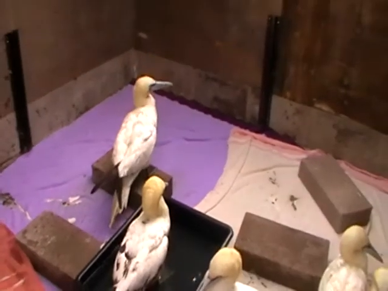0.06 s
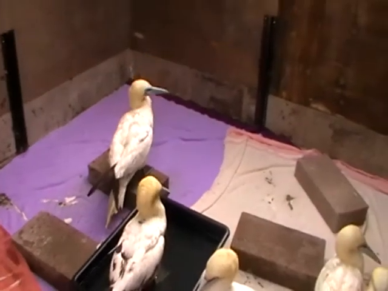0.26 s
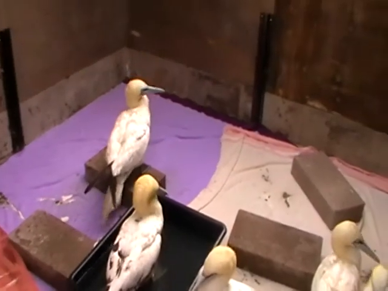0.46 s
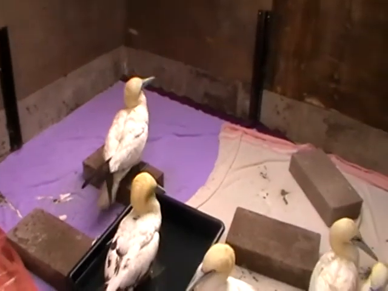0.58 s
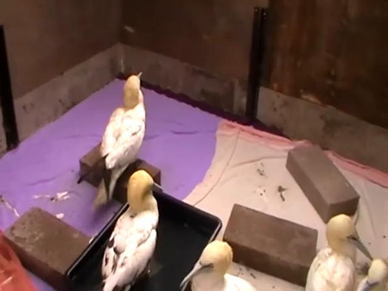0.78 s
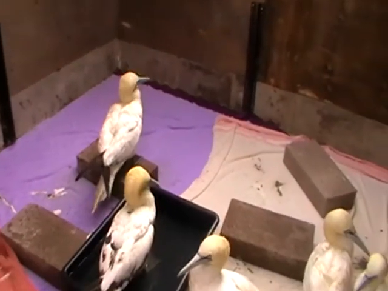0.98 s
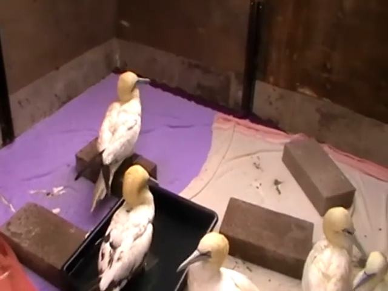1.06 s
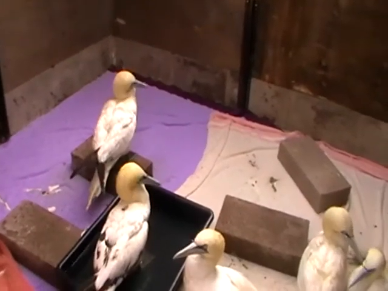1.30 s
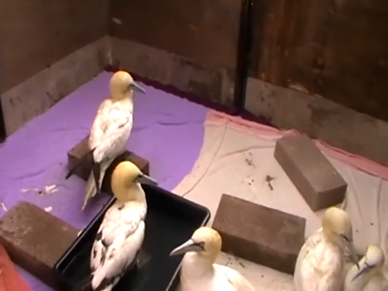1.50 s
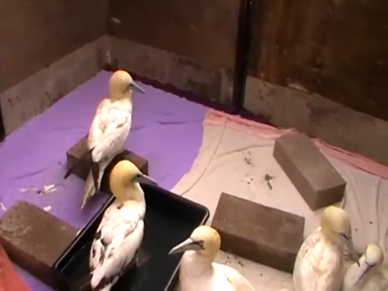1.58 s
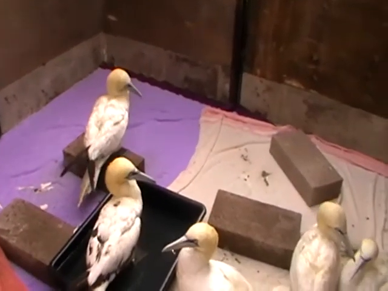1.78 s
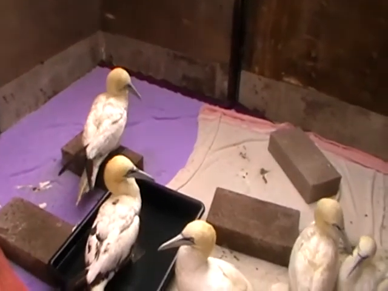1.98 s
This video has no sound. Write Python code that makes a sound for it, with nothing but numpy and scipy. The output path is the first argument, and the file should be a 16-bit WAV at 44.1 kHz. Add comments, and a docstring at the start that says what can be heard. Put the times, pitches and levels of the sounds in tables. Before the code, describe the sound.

One hoarse seabird squawk, squeaky at first and then rough and rattling, comes from fairly close in front of the microphone. The hard walls of a small pen ring briefly, and low ventilation noise runs throughout.

```python
"""A gannet gives one harsh call in a small indoor pen, nearly centred before a stereo microphone.
The two sides of its syrinx sound at once: a low, slowly sinking voice and a brief high whistle that
jumps register. The low voice splits into subharmonics and breaks up into a rasp of irregular pulses.
The bird is close enough to stand a little above the answer of the walls; ventilation runs behind it."""
import sys
import numpy as np
from scipy import signal
from scipy.fft import rfft, irfft, next_fast_len
from scipy.io import wavfile
from scipy.ndimage import map_coordinates

SR = 44100
rng = np.random.default_rng(int(sys.argv[2]) if len(sys.argv) > 2 else 0)


def bounce(signal):
    """Save signal as a 16-bit WAV file at the path given by the first command-line argument."""
    frames = np.transpose(np.atleast_2d(signal))
    limited = np.clip(frames, -1, 1)
    pcm = np.round(limited * 32767).astype(np.int16)
    wavfile.write(sys.argv[1], SR, pcm)


N = 90404

# colour of the ventilation: frequency_hz, gain_db
VENT_SPECTRUM = [(25, -16), (60, -6), (100, -4), (140, -1), (200, -2.5), (280, -2.5), (370, 0), (520, -2.5),
                 (700, -4), (1000, -6), (1500, -7.5), (2200, -12), (4400, -18), (7000, -27), (10000, -37.5),
                 (15500, -44.5)]
# likeness of the air noise left and right: frequency_hz, correlation
VENT_CORRELATION = [(60, 0.89), (180, 0.93), (550, 0.9), (1650, 0.56), (4970, 0.74), (15000, 0.13)]
# fan hum: pitch_hz, level_db
FAN_HUM = [(41, -63.5), (82, -70), (366, -63.5)]
# time the pen takes to die away by 60 dB: frequency_hz, decay_s
PEN_DECAY = [(300, 0.36), (2700, 0.41), (6000, 0.34), (12000, 0.24)]

# The bird's levels are relative, ahead of its overall gain in scene().
# strength of the rasp: time_s, level_db
RASP_LEVEL = [(.195, -54.5), (.228, -30.5), (.245, -36), (.29, -42), (.35, -55), (.42, -43), (.5, -40),
              (.6, -38.5), (.66, -35.5), (.78, -36), (.89, -34), (.97, -33.5), (1.0, -38), (1.03, -33.5),
              (1.06, -50.5), (1.095, -72)]
# resonances of the throat and open bill: frequency_hz, gain_db
THROAT_RESPONSE = [(600, -55.5), (1150, -24), (1350, -6), (1490, -8), (1620, -3), (1780, -3.5), (1950, -13),
                   (2170, 1.5), (2440, -9), (2780, -2.5), (3400, -10.5), (4100, -13), (4800, -15.5),
                   (5550, -18), (6100, -27), (7200, -26), (8600, -30.5), (11000, -40), (15000, -60.5)]
# the rasp's treble, duller as the call starts and ends: time_s, gain_db
RASP_TREBLE = [(.2, -3), (.25, 0.5), (.5, 7), (.72, 3.5), (.9, 0.5), (1.04, -7)]
# whistle notes: start_s, end_s, first_pitch_hz, last_pitch_hz, level_db, upper_partials_db
WHISTLE_NOTES = [(0.237, 0.278, 2667, 2620, -28, -0.5), (0.286, 0.312, 2623, 2635, -41.5, 8),
                 (0.288, 0.341, 3406, 3510, -33.5, -2.5), (0.323, 0.368, 3375, 3320, -30, -10.5),
                 (0.374, 0.441, 2644, 2561, -30.5, 1), (0.406, 0.447, 3340, 3253, -37, -7.5)]
# whistle harmonics and sum tones, fundamental first: whistle_multiple, low_voice_multiple, gain_db
WHISTLE_PARTIALS = [(1, 0, -2), (2, 0, -10.5), (3, 0, -23.5), (1, 1, -10.5), (2, 1, -24.5)]
# subharmonics, on quarters of the low pitch: quarter_multiple, gain_db
SUBHARMONIC_LINES = [(5, -7.5), (6, -4.5), (7, -6.5), (9, -6.5), (10, -28), (11, -6), (13, -11), (14, -22),
                     (15, -13.5)]
# strength of the subharmonics: time_s, level_db
SUBHARMONIC_LEVEL = [(.42, -70), (.46, -39.5), (.51, -42), (.55, -32.5), (.585, -58), (.65, -36.5),
                     (.76, -44), (.815, -38), (.85, -45), (.9, -35.5), (.95, -43)]
# faint undertone at a quarter of the low pitch: time_s, level_db
UNDERTONE_LEVEL = [(.38, -53), (.58, -67.5), (.65, -52.5), (.9, -63.5), (.98, -47), (1.07, -53.5)]
# sinking pitch of the low voice: time_s, pitch_hz
VOICE_PITCH = [(.24, 1567), (.30, 1535), (.40, 1503), (.47, 1443), (.595, 1431), (.625, 1379), (.665, 1412),
               (.72, 1367), (.80, 1356), (.89, 1340), (.98, 1148), (1.06, 978)]
# strength of the low voice: time_s, level_db
VOICE_LEVEL = [(.235, -68), (.262, -31), (.305, -43.5), (.33, -62), (.385, -49.5), (.405, -33.5),
               (.432, -44.5), (.458, -27.5), (.505, -29.5), (.53, -31.5), (.575, -33), (.62, -32),
               (.652, -42.5), (.675, -34.5), (.71, -36), (.735, -44.5), (.765, -31.5), (.805, -49),
               (.835, -37.5), (.89, -38.5), (.94, -76)]
# overtones of the low voice: multiple, gain_db
VOICE_OVERTONES = [(2, -1), (3, -10.5), (4, -19.5), (5, -27), (6, -32.5)]
# lift of all those overtones against the fundamental: time_s, gain_db
VOICE_BRIGHTNESS = [(.27, 1), (.31, 3), (.38, -9), (.425, 7.5), (.46, -5.5), (.54, -0.5), (.62, 3.5),
                    (.78, 7), (.9, 2)]

VENT_DB, ROOM_DB, CALL_DB = -46, -3.5, -3.0
VENT_PAN_DB, BIRD_PAN_DB = -0.5, 0.2  # added on the left, taken off the right
RASP_RATE_HZ, RASP_GAP_SCATTER, RASP_SIZE_SCATTER_DB, RASP_TREBLE_HZ = 520, .5, 1, 6000
PUFF_DECAY_S, PUFF_SHARE = 0.003, 0.62
WHISTLE_ATTACK_S, WHISTLE_RELEASE_S, WHISTLE_TOP_HZ = 0.0059, 0.0065, 8220
MIC_TOP_HZ = 15700


def amp(db):
    """Decibels to gain."""
    return 10 ** (np.asarray(db) / 20)


def unit(x):
    """Scale to rms 1."""
    return x / np.sqrt(np.mean(x ** 2) + 1e-20)


def along(points, hz):
    """Read (frequency_hz, value) points on a log axis."""
    f, v = np.transpose(points)
    return np.interp(np.log(hz + 1), np.log(f + 1), v)


def curve(rows):
    """One value per sample from (time_s, value) points."""
    return np.interp(np.arange(N) / SR, *np.transpose(rows))


def level(rows):
    """Gain from (time_s, level_db) points, silent outside them."""
    s, db = np.transpose(rows)
    return amp(np.interp(np.arange(N) / SR, s, db, left=-np.inf, right=-np.inf))


def wobble(rate):
    """A smooth random curve, rate knots a second."""
    return map_coordinates(rng.standard_normal(N // 4), [np.arange(N) * rate / SR], mode="wrap")


def phase_of(hz):
    """Running phase of a pitch curve, in radians."""
    return 2 * np.pi * np.cumsum(hz) / SR


def filtered(x, response):
    """Shape x by a gain that depends on frequency."""
    size = next_fast_len(N + SR // 2)
    return irfft(rfft(x, size) * response(np.fft.rfftfreq(size, 1 / SR)), size)[..., :N]


def resonate(x, points):
    """Ring x through a minimum-phase filter of (frequency_hz, gain_db) points."""
    size = 4096
    cepstrum = irfft(np.log(amp(along(points, np.fft.rfftfreq(size, 1 / SR)))))
    cepstrum[1:size // 2] *= 2
    cepstrum[size // 2 + 1:] = 0
    return signal.fftconvolve(x, irfft(np.exp(rfft(cepstrum))))[:N]


def ventilation():
    """Steady air noise fills the pen, nearly mono in the bass, with a faint wavering fan hum."""
    def mid_side_gains(hz):
        angle = np.arccos(along(VENT_CORRELATION, hz)) / 2
        return amp(along(VENT_SPECTRUM, hz)) * [np.cos(angle), np.sin(angle)]

    mid, side = filtered(rng.standard_normal((2, N)), mid_side_gains)
    air = np.array([mid + side, mid - side]) * amp([[VENT_PAN_DB], [-VENT_PAN_DB]])
    hum = sum(amp(db) * np.sin(phase_of(hz * (1 + 0.0189 * wobble(12)))) for hz, db in FAN_HUM)
    return amp(VENT_DB) * unit(air) + np.sqrt(2) * hum


def pen_walls(call, width, delay_samples):
    """The hard walls give a short, dense answer that reaches the microphone just behind the call."""
    hz, t, noise = signal.stft(rng.standard_normal((2, SR // 2)), SR, nperseg=256)
    decay = np.exp(-np.log(1000) * t / along(PEN_DECAY, hz)[:, None])
    tail = signal.istft(noise * decay, SR, nperseg=256)[1]
    delayed = np.pad(call, (delay_samples, 0))[None]
    mid, side = signal.fftconvolve(delayed, tail / np.linalg.norm(tail[0]), axes=1)[:, :N]
    return np.array([mid + width * side, mid - width * side])


def rasp(croak_db, croak_hz):
    """Irregular pulses, each with a puff of air, ring the throat in uneven croaks."""
    croaks = amp(croak_db * wobble(croak_hz))
    gap_draw, size_draw = rng.standard_normal((1500, 2)).T
    onsets_s = np.cumsum(np.exp(RASP_GAP_SCATTER * gap_draw)) / RASP_RATE_HZ
    pulses = np.bincount(np.round(onsets_s * SR).astype(int), amp(RASP_SIZE_SCATTER_DB * size_draw), N)
    pulses = pulses[:N]
    puff_envelope = signal.lfilter([1], [1, -np.exp(-1 / (SR * PUFF_DECAY_S))], pulses)
    puffs = puff_envelope * rng.standard_normal(N)
    ring = np.sqrt(1 - PUFF_SHARE) * unit(resonate(pulses, THROAT_RESPONSE))
    breath = np.sqrt(PUFF_SHARE) * unit(resonate(puffs, THROAT_RESPONSE))
    sound = croaks * level(RASP_LEVEL) * (ring + breath)
    body = filtered(sound, lambda hz: 1 / (1 + (hz / RASP_TREBLE_HZ) ** 4))
    return body + amp(curve(RASP_TREBLE)) * (sound - body)


def whistle(low_phase, jitter, flutter_db):
    """One side of the syrinx hops between two registers and makes sum tones with the low voice."""
    t, notes = np.arange(N) / SR, np.zeros(N)
    for start, end, first_hz, last_hz, db, upper_db in WHISTLE_NOTES:
        glide_hz = curve([(start, first_hz), (end, last_hz)])
        phase = phase_of(glide_hz * (1 + jitter * wobble(600)))
        attack = np.clip((t - start) / WHISTLE_ATTACK_S, 0, 1)
        release = np.clip(1 - (t - end) / WHISTLE_RELEASE_S, 0, 1)
        upper = sum(amp(partial_db + flutter_db * wobble(199.7)) * np.sin(k * phase + j * low_phase)
                    for k, j, partial_db in WHISTLE_PARTIALS[1:])
        tone = unit(np.sin(phase) + amp(upper_db) * upper)
        notes += attack * release * amp(db + flutter_db * wobble(150.2)) * tone
    return filtered(notes, lambda hz: 1 / (1 + (hz / WHISTLE_TOP_HZ) ** 20))


def subharmonics(low_phase, smear_rad, flutter_db):
    """The vibration repeats only every fourth cycle, unsteadily: fuzzy lines and a faint undertone."""
    quarter = low_phase / 4
    lines = sum(amp(db + flutter_db * wobble(89.54)) * np.sin(k * quarter + smear_rad * wobble(200))
                for k, db in SUBHARMONIC_LINES)
    return np.sqrt(2) * (level(SUBHARMONIC_LEVEL) * lines + level(UNDERTONE_LEVEL) * np.sin(quarter))


def low_voice(phase, flutter_db, flutter_hz):
    """The other side of the syrinx sounds a fundamental and overtones, fluttering in strength."""
    overtones = sum(amp(db) * np.sin(k * phase) for k, db in VOICE_OVERTONES)
    brightness = amp(curve(VOICE_BRIGHTNESS) + flutter_db * wobble(flutter_hz))
    envelope = level(VOICE_LEVEL) * amp(flutter_db / 2 * wobble(flutter_hz))
    return np.sqrt(2) * envelope * (np.sin(phase) + brightness * overtones)


def gannet(jitter, rasp_jitter, hoarse_rad):
    """The whole call at the bill; the pitch grows less steady as the rasp takes over."""
    roughness = level(RASP_LEVEL) / level(RASP_LEVEL).max()
    waver = 1 + jitter * wobble(110) + rasp_jitter * roughness * wobble(700)
    phase = phase_of(curve(VOICE_PITCH) * waver) + hoarse_rad * wobble(1300)
    return (rasp(croak_db=0.9, croak_hz=110.3)
            + low_voice(phase, flutter_db=2.5, flutter_hz=150)
            + subharmonics(phase, smear_rad=0.27, flutter_db=4.5)
            + whistle(phase, jitter=0.0059, flutter_db=2.34))


def scene():
    """At the microphone: the bird almost dead ahead, the walls around it, the ventilation behind."""
    call = amp(CALL_DB) * gannet(jitter=0.012, rasp_jitter=0.0194, hoarse_rad=0.11)
    direct = call * amp([[BIRD_PAN_DB], [-BIRD_PAN_DB]])
    walls = amp(ROOM_DB) * pen_walls(call, width=0.6, delay_samples=130)
    return direct + walls + ventilation()


def record(dry):
    """The camera's microphone cuts the deepest rumble and everything above its band limit."""
    return filtered(dry, lambda hz: (hz < MIC_TOP_HZ) * amp(along([(26, -19), (38, 0.5)], hz)))


dry = scene()
out = record(dry)
bounce(out)
```